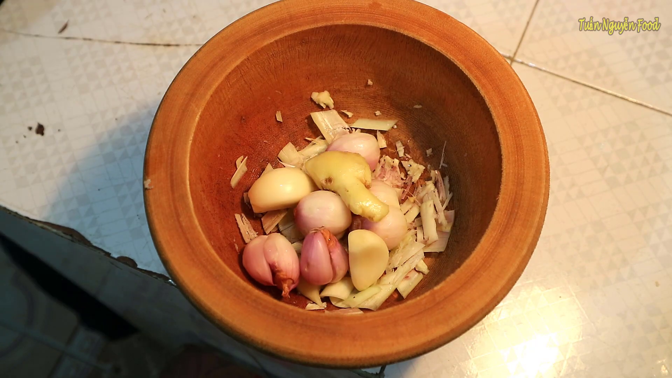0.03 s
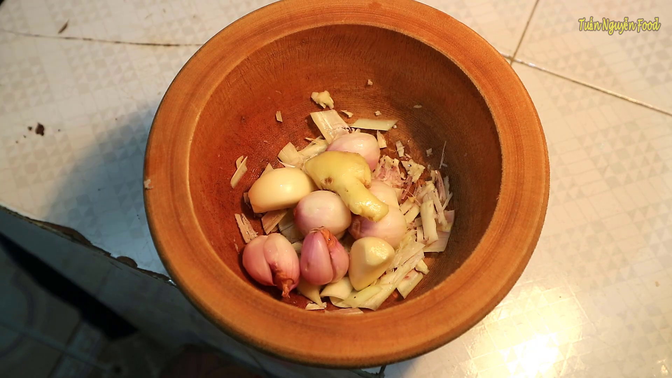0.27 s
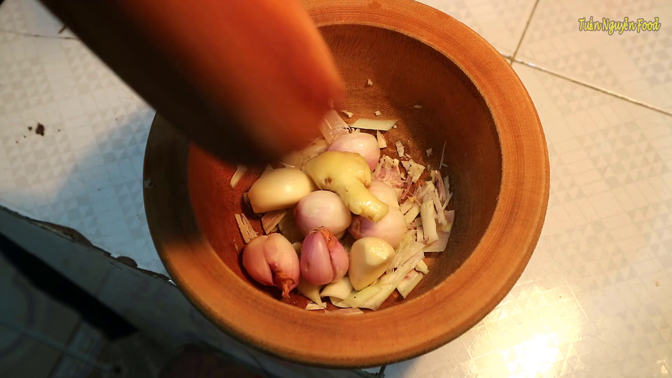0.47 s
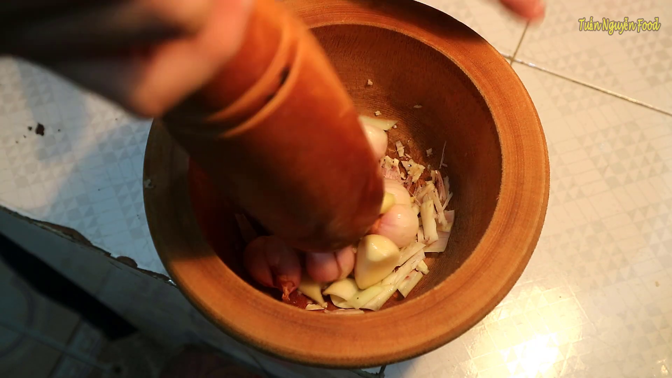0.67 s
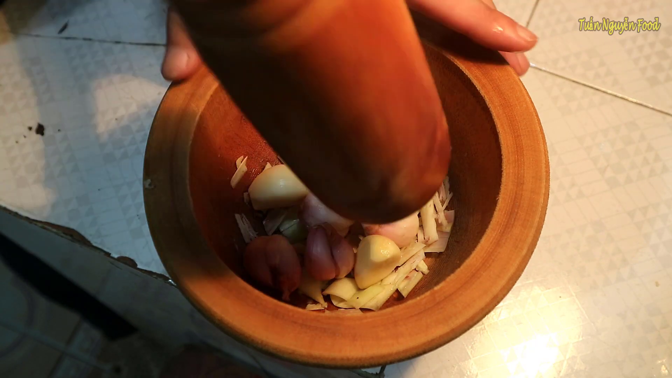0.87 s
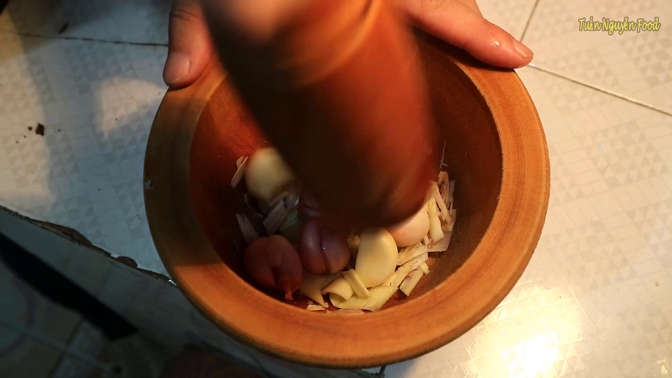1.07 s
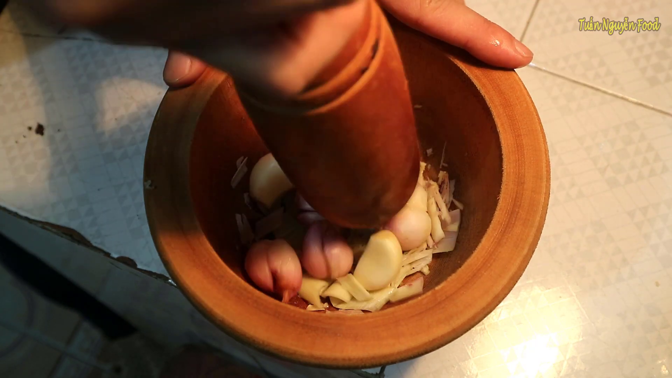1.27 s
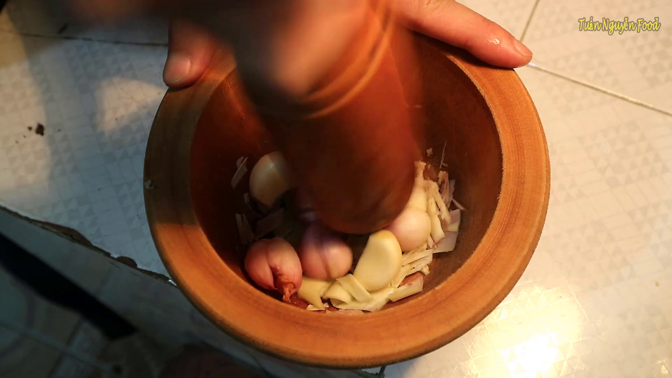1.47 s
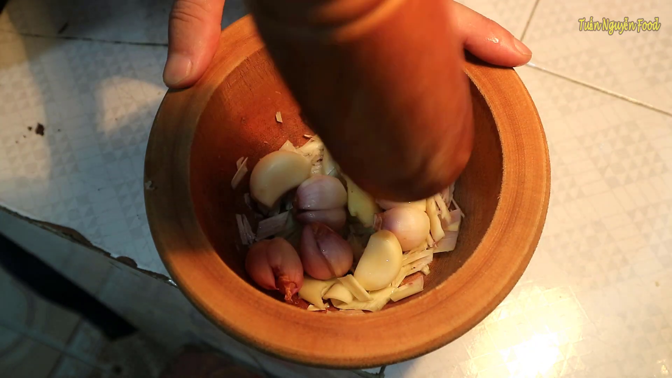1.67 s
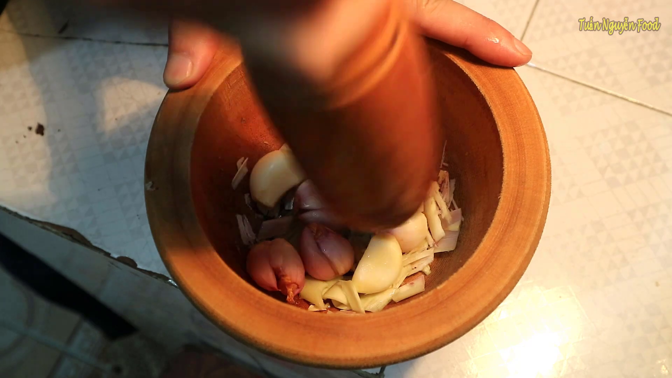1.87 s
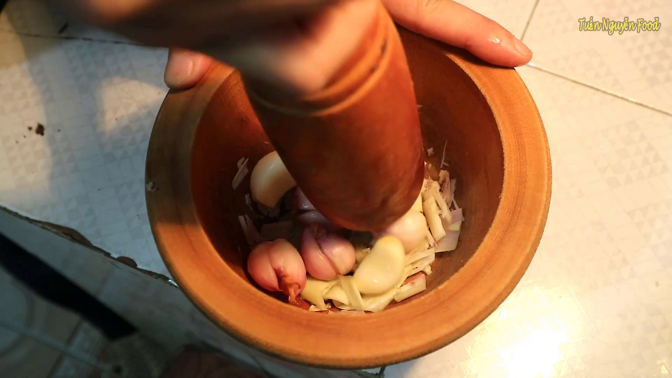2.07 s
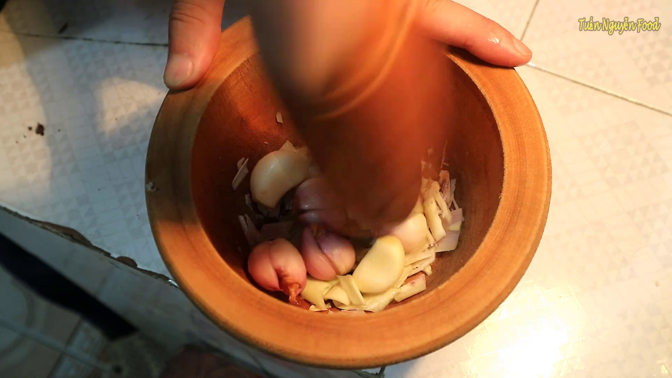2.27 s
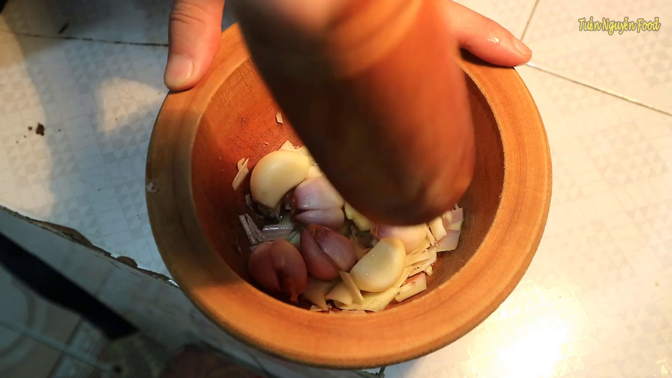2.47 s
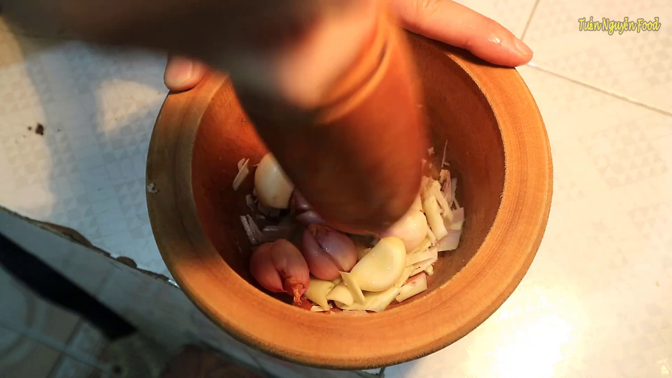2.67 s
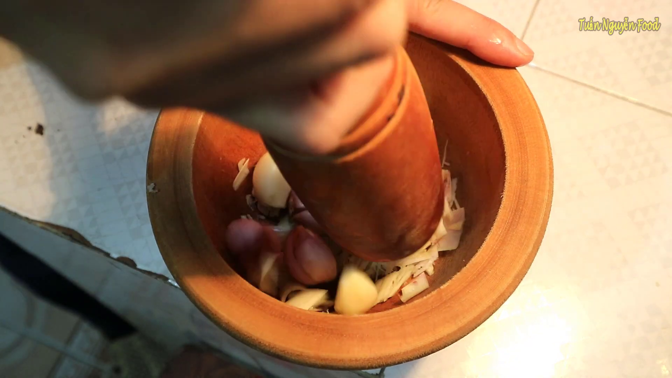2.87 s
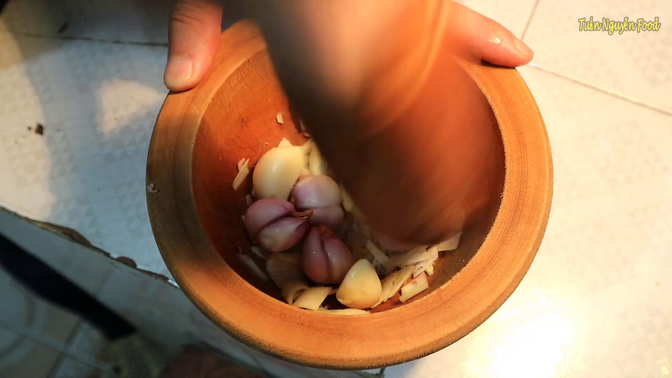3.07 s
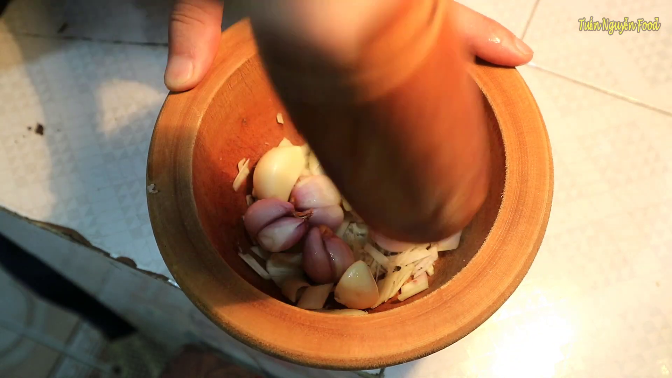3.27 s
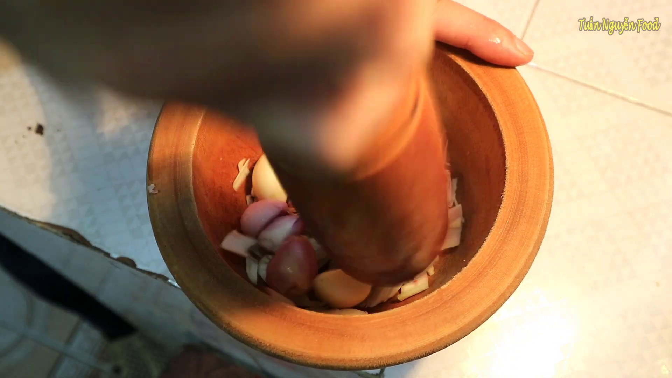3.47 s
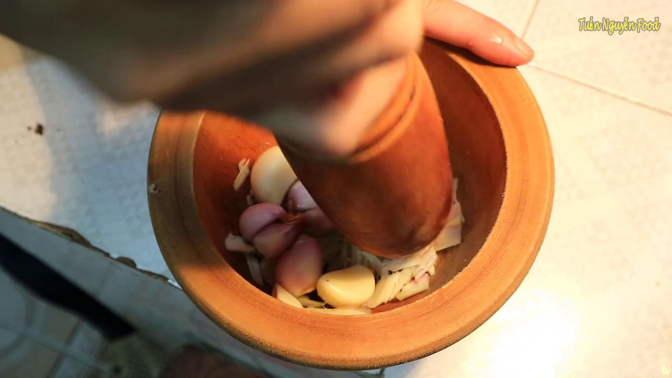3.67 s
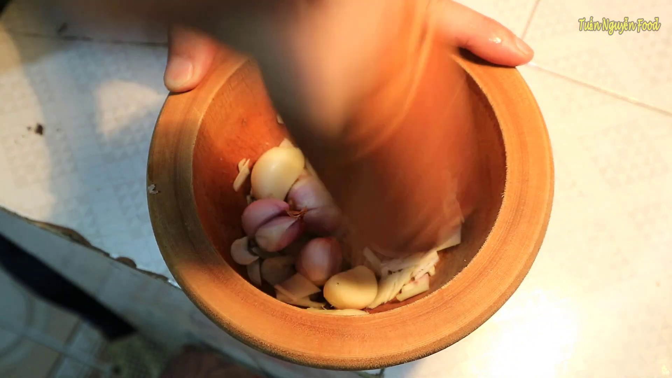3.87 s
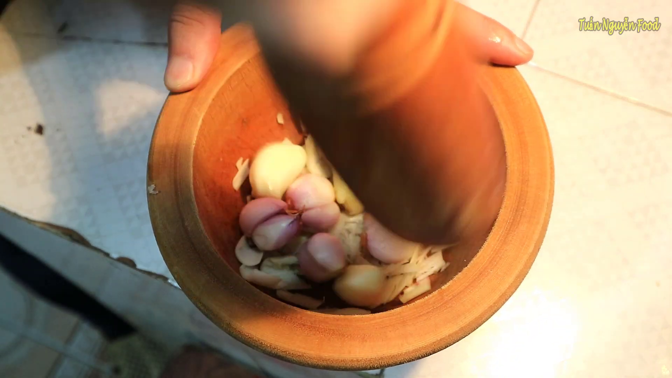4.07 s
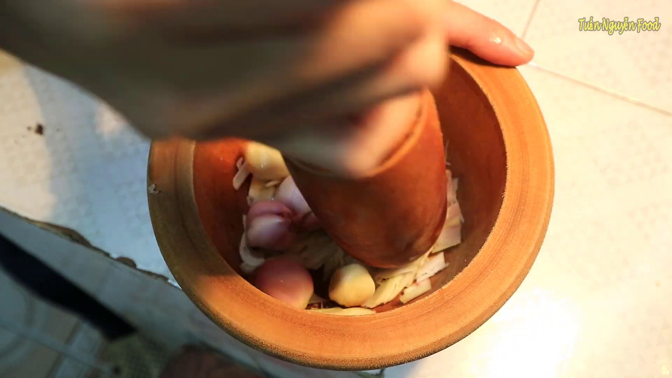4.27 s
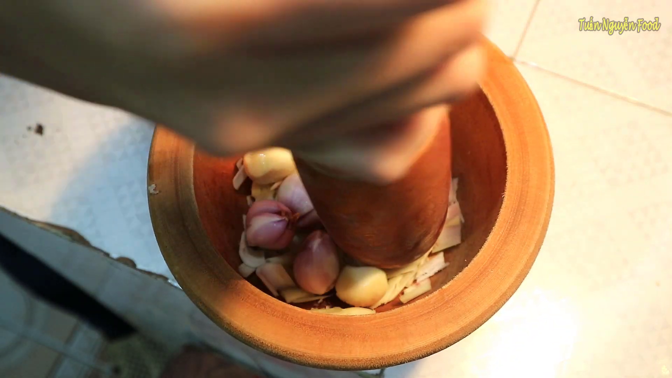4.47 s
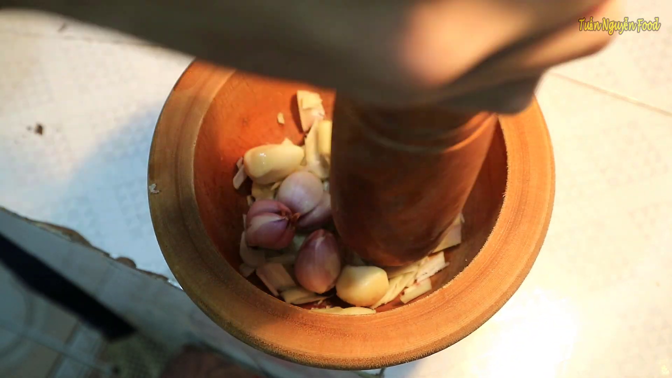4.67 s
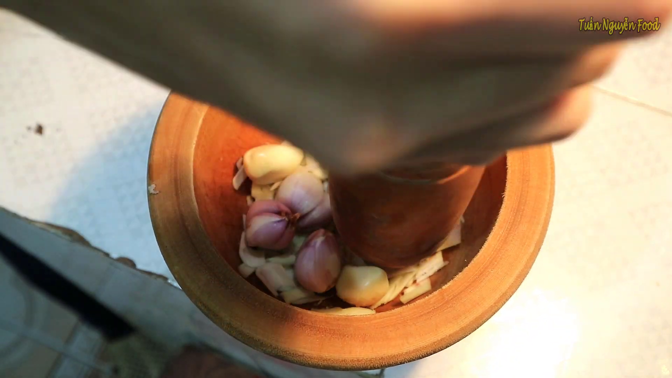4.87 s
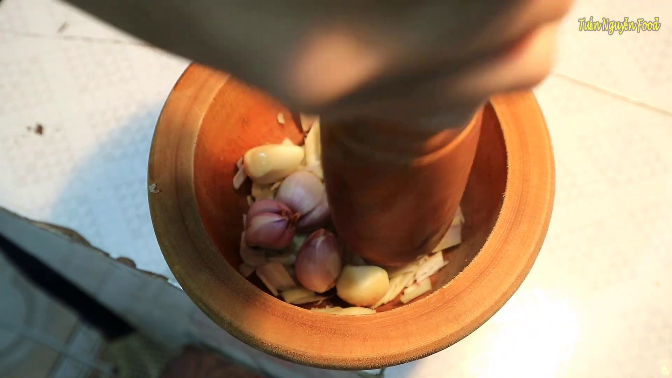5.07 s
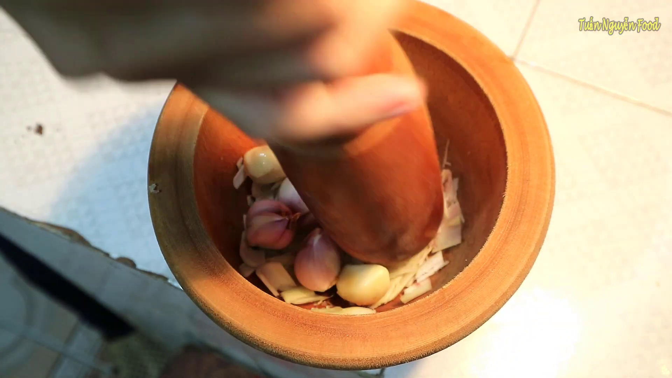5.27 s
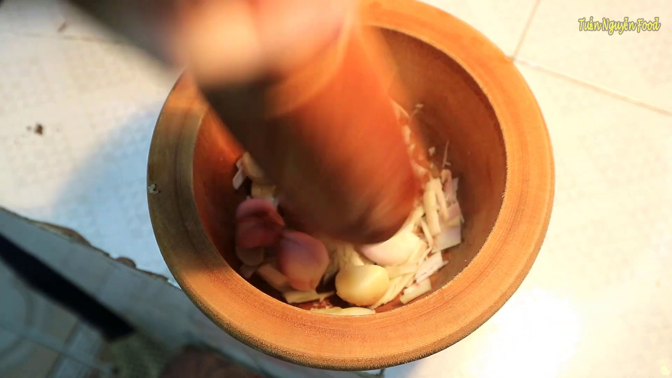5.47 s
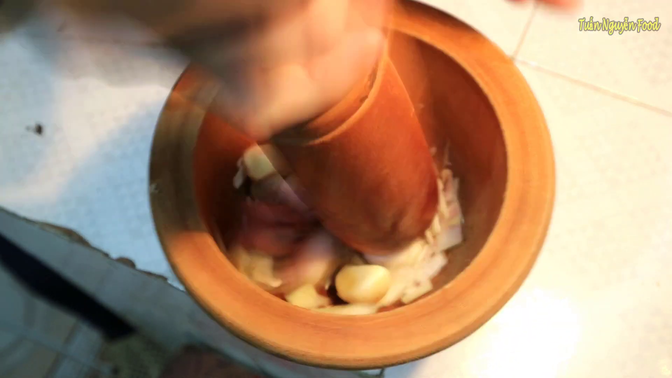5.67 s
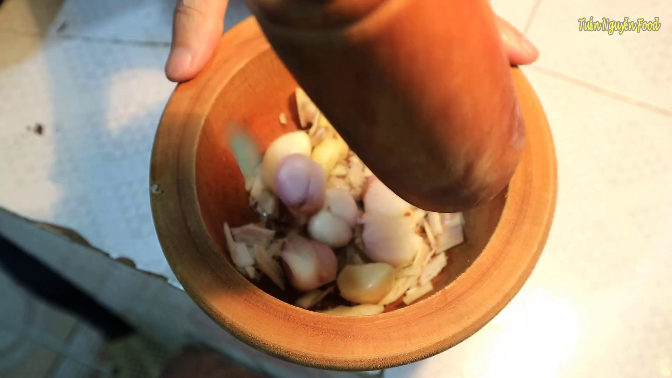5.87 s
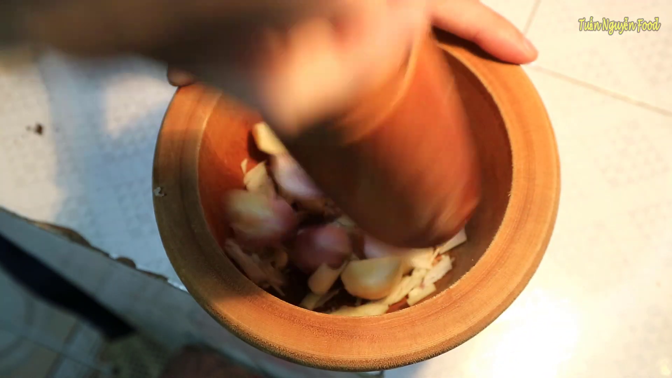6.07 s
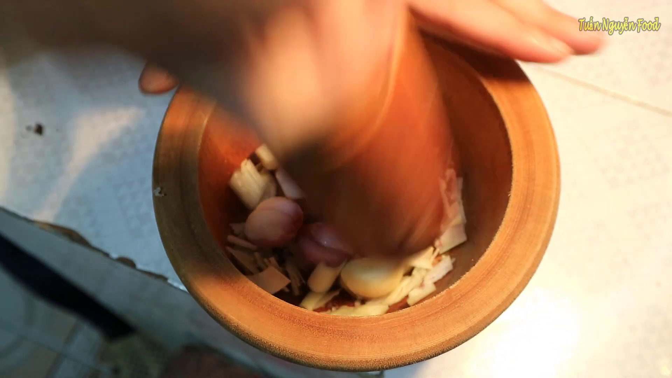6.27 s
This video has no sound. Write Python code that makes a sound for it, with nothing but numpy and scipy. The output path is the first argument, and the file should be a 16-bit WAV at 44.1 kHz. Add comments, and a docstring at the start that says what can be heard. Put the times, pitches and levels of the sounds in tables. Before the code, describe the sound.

Quiet, low kitchen room noise with faint sleeve movement opens the scene. Around 0.7 s the wooden pestle slides softly down the mortar wall and lands with a small, muffled double knock. From 1.0 to 4.25 s, thirteen firm blows fall roughly every 0.27 s: short hollow wooden knocks, slightly varied in pitch and hardness, each with crackling garlic skins and fibres. Boomy low counter resonance is strongest around 2.1 to 2.6 s; crunches grow brighter and sharper later, with the hardest crack near 3.2 s. Pounding stops from 4.3 to 5.7 s, leaving soft arm and cloth rustles, most noticeable near 5.05 and 5.4 s, and a barely audible tap at 5.13 s. A short rub leads to firm crunchy blows at 5.75 and 6.02 s, then a weak bounce at 6.13 s. Close stereo, stronger on the right, with short hard-room reflections.

```python
"""Small hard kitchen, tiled counter: a wooden pestle pounds garlic, shallots and lemongrass in a wooden mortar.
Two-port microphone; the mortar lies to its right, so the left port hears it weaker. Quiet room noise beneath.
Each blow swells for a few milliseconds as the herbs crush, knocks the bowl and sets low counter modes booming.
Snapping fibres are swarms of noise clicks; arm rustle and the pestle's slide are coloured, grainy noise.
Wall echoes and a dense noise tail answer the knocks and slides; a hiss of its own answers each crunch."""
import sys
import numpy as np
from scipy import signal
from scipy.fft import rfft, irfft
from scipy.io import wavfile
from scipy.ndimage import uniform_filter1d

SR = 44100
rng = np.random.default_rng(int(sys.argv[2]) if len(sys.argv) > 2 else 0)


def materialize(psi):
    """Save the field psi as 16-bit PCM at rate SR to the path in sys.argv[1].

    A 1-D psi becomes a single channel; in a 2-D psi each row is a channel.
    """
    bounded = np.clip(np.atleast_2d(psi).T, -1, 1)
    quanta = np.round(bounded * 32767).astype(np.int16)
    wavfile.write(sys.argv[1], SR, quanta)


N = 278712
T = np.arange(N) / SR


def amp(db):
    """Decibels to gain."""
    return 10 ** (np.asarray(db) / 20)


def unit(x):
    """Scales to rms 1."""
    return x / np.sqrt(np.mean(x ** 2) + 1e-20)


def burst(x, seconds):
    """Scales a short sound so that its energy equals rms 1 over the given time."""
    return x / np.sqrt(np.sum(x ** 2) / (seconds * SR) + 1e-20)


def read(points, hz):
    """Reads a curve on a log-frequency axis."""
    f, value = np.transpose(points)
    return np.interp(np.log(hz + 1), np.log(f + 1), value)


def colour(x, points, tilt_db=0):
    """Filters by a spectrum, tilted in dB per octave between 2.5 and 10 kHz."""
    hz = np.fft.rfftfreq(x.shape[-1], 1 / SR)
    octaves = np.log2(np.clip(hz, 2500, 10000) / 5000)
    gain = amp(read(points, hz) + tilt_db * octaves)
    return irfft(rfft(x) * gain, x.shape[-1])


def add(mix, s, sound):
    """Mixes a sound in at time s."""
    part = mix[..., max(round(s * SR), 0):][..., :sound.shape[-1]]
    part += sound[..., :part.shape[-1]]


def grainy(depth_db, samples):
    """Uneven gain from smoothed noise, varying by depth_db rms."""
    smooth = uniform_filter1d(rng.standard_normal(N), size=samples)
    return amp(depth_db * unit(smooth))


def correlated(a, b, likeness):
    """Mixes two noises into one whose correlation with a is likeness."""
    return likeness * a + np.sqrt(1 - likeness ** 2) * b


def diffuse(points, left_db, likeness):
    """Noise of a given colour that reaches the two ports from all sides."""
    a, b = unit(colour(rng.standard_normal((2, N)), points))
    return np.array([amp(left_db) * correlated(a, b, likeness), a])


# how far the left port leads the right one: f/Hz, phase/rad
PORT_PHASE_LEAD = [(100, 4.55), (190, 4), (340, 2.2), (600, 1), (850, .65), (1200, 1.2), (2500, .3)]


def ports(x, left_db):
    """The two microphone ports: the left one is weaker and leads in phase."""
    lead = read(PORT_PHASE_LEAD, np.fft.rfftfreq(N, 1 / SR))
    left = irfft(rfft(x) * np.exp(1j * lead), N)
    return np.array([amp(left_db) * left, x])


# colour of the quiet kitchen before it is scaled: f/Hz, level/dB
ROOM_NOISE = [(20, -18), (45, -8.5), (75, -10.5), (102, 1.5), (160, -7.5), (280, -8), (380, -4.5),
              (500, -11.5), (700, -10), (1100, -12.5), (1700, -22), (5000, -38.5), (11200, -56),
              (15000, -70)]


def room_noise(level_db=-57):
    """Steady room noise under the pounding, partly opposed in phase between the ports."""
    return amp(level_db) * diffuse(ROOM_NOISE, left_db=-4, likeness=-0.49)


# decay time of the tail: f/Hz, t60/s
TAIL_T60 = [(150, 1), (400, 0.58), (900, 0.42), (2000, 0.5), (5000, .3), (12000, .2)]
# colour of the tail: f/Hz, level/dB
TAIL_COLOUR = [(150, -30.5), (400, 2.5), (650, -13.5), (850, -14.3), (1300, -12.3), (2000, -14.5),
               (3000, -13.5), (5000, -11), (9000, -13.5), (12000, -7), (14000, -21)]
# first reflections, before their treble is dulled: delay/s, left gain, right gain
WALL_ECHOES = [(.0083, .06, -0.032), (.0118, -0.084, 0.038), (.0147, 0.019, 0.15), (.0185, .05, -.09),
               (.0335, 0.037, 0.05)]


def kitchen(x, left_db=-5.5, likeness=-0.19):
    """A few wall echoes, 3 to 11 m longer than the direct path, and a tail whose bands die at their own speeds."""
    a, b = rng.standard_normal((2, SR))
    noise = np.array([correlated(a, b, likeness), a])
    hz, t, bands = signal.stft(noise, SR, nperseg=256)
    t60 = read(TAIL_T60, hz)[:, None]
    bands = bands * amp(read(TAIL_COLOUR, hz)[:, None] - 60 * t / t60)
    bands *= np.sqrt(2 * np.log(1000) / (t60 * SR))  # slow and fast bands carry equal energy before colouring
    response = signal.istft(bands, SR, nperseg=256)[1][:, :SR] * amp([[left_db], [0]])
    response *= 1 - np.exp(-(np.arange(SR) / SR / 0.0021) ** 2)  # the tail builds up
    echoes = np.zeros((2, SR))
    for delay, left, right in WALL_ECHOES:
        add(echoes, delay, np.array([[left], [right]]))
    response += colour(echoes, [(1200, 2), (3000, -10.5), (12000, -21)])  # clutter scatters the treble
    return signal.fftconvolve(x[None], response, axes=1)[:, :N]


def swell(middle, half_length):
    """The speed of one movement: it gathers, peaks and eases off."""
    return 1 / np.cosh(np.clip((T - middle) / half_length, -20, 20))


# colour of the sleeve: f/Hz, level/dB
RUSTLE_SPECTRUM = [(150, -41), (250, -15), (394, -11), (429, -13), (507, -1), (962, -3), (1200, -3),
                   (3340, -5.5), (11100, -20), (14000, -45)]
# arm and sleeve moving near the microphone: middle t/s, relative level/dB, half length/s
ARM_MOVES = [(.055, -61, .055), (.44, -59.5, .085), (.6, -59.5, .1), (4.55, -63, .06), (4.77, -57, .05),
             (4.905, -54, .045), (5.048, -48.5, .024), (5.17, -55.5, .07), (5.39, -47.5, .048),
             (5.6, -62, .14), (5.95, -62, .14)]


def hand(rustle_db=1., still_db=-70, swing_db=-68.5, swing_lead_s=0.013, swing_s=0.026):
    """Soft rustle that follows the arm's speed: on each movement, and a little on each firm downstroke."""
    power = amp(still_db) ** 2  # faint rustle between movements
    for s, db, half_length in ARM_MOVES:
        power = power + (amp(db) * swell(s, half_length)) ** 2
    strokes = sum(swell(s - swing_lead_s, swing_s) for s, db, *_ in BLOW_LIST if db > -30)
    level = amp(rustle_db) * np.sqrt(power) + amp(swing_db) * strokes
    return level * grainy(0.8, samples=400) * diffuse(RUSTLE_SPECTRUM, left_db=-1, likeness=-0.14)


# colour of wood rubbing on wood: f/Hz, level/dB
SLIDE_SPECTRUM = [(120, -36.5), (280, -5), (450, 0), (680, 0), (1100, 0), (1500, -6), (2300, -5),
                  (3200, -7), (5000, -23), (9000, -33), (13000, -52)]
# the pestle sliding down the wall into the heap: start t/s, length/s, level/dB
SLIDE_LIST = [(.698, .042, -42.5), (5.672, .07, -43)]


def slide(rise_s=.022, t60_s=.09):
    """The pestle rubs down the wall in fine uneven slips; the rub builds, holds and dies when the pestle lands."""
    level = np.zeros(N)
    for s, length, db in SLIDE_LIST:
        after_landing = np.maximum(T - s - length, 0)
        level += np.clip((T - s) / rise_s, 0, 1) * amp(db - 60 * after_landing / t60_s)
    slips = grainy(1.5, samples=150) * rng.standard_normal(N)
    return level * unit(colour(slips, SLIDE_SPECTRUM))


# colour of the room's hiss after a crunch: f/Hz, level/dB
WASH_COLOUR = [(400, -12), (1200, -3), (2000, 1.5), (2700, -1.5), (2980, 6), (3300, -1.5), (4400, -1),
               (6500, -6), (9000, -12), (11800, -19.5), (13300, -32), (16000, -49)]


def wash(wash_db=-8.3, early_t60=0.14, late_t60=0.37, late_db=-5., late_tilt_db=-0.5,
         tilt_share=0.41, left_db=-4., full_s=0.0022):
    """Each crunch scatters off the bowl and the tiles as a smooth hiss that dulls as it dies."""
    out, t = np.zeros((2, N)), np.arange(SR // 2) / SR
    build = 1 - np.exp(-t / 0.0023)
    for s, db, spread, bright_db, _ in CRUNCH_LIST:
        share = np.sqrt(min(spread / full_s, 1))  # a very short crack scatters less
        tilt_db = tilt_share * bright_db
        early, late = rng.standard_normal((2, 2, len(t)))
        early = colour(early, WASH_COLOUR, tilt_db) * amp(-60 * t / early_t60)
        late = colour(late, WASH_COLOUR, tilt_db + late_tilt_db) * amp(late_db - 60 * t / late_t60)
        add(out, s, share * amp(db + wash_db) * burst((early + late) * build, 0.028))
    return out * amp([[left_db], [0]])


# low modes of the counter and the kitchen: f/Hz, level/dB, t60/s
COUNTER_MODES = [(87.5, -3.5, 0.59), (98.63, 3, 0.6), (113.5, 1.5, 0.45), (126.6, -8.5, 0.65),
                 (134.6, -4.5, 1), (149.6, -4.5, 0.58), (161.36, -2, 0.66), (188.3, 3, 0.46),
                 (194.5, -11.5, 0.86), (229, -1.5, 0.34), (252, -9, .3), (292, 5.5, 0.13),
                 (334.1, -6.5, 0.37)]


def counter(boom_db=-4.0, rise_s=0.0025, build_s=0.06, early=0.71):
    """Every blow passes through the mortar's foot and wakes the same beating low modes."""
    t = np.arange(SR) / SR
    hz, level, t60 = np.transpose(COUNTER_MODES)[:, :, None]
    spread = np.pi * np.arange(len(hz))[:, None] ** 2 / len(hz)  # the modes do not peak together
    boom = (amp(level - 60 * t / t60) * np.sin(2 * np.pi * hz * t + spread)).sum(0)
    boom *= 1 - np.exp(-t / rise_s)
    boom *= 1 - (1 - early) * np.exp(-t / build_s)
    boom = signal.sosfilt(signal.butter(2, 66, "highpass", fs=SR, output="sos"), boom)  # deep bass radiates poorly
    out = np.zeros(N)
    for s, *_, db in BLOW_LIST:
        add(out, s - .003, amp(db + boom_db) * burst(boom, 0.18))
    return out


def contact(t, lead_s=0.0065, edge_s=0.0005):
    """Gate that opens as the pestle meets the heap, a few milliseconds before it stops at t = 0."""
    return .5 + .5 * np.tanh((t + lead_s) / edge_s)


# colour of breaking fibres: f/Hz, level/dB
FIBRE_COLOUR = [(500, -20), (1500, 1), (2200, 0.5), (3000, 1.5), (4300, 4), (5200, -2), (7000, -3.5),
                (9000, -8), (11500, -16), (13000, -23), (16000, -33)]
# herbs and skins breaking: t/s, relative level/dB, relative spread/s, relative brightness/(dB per octave),
# snapping piece f/Hz
CRUNCH_LIST = [(0.0852, -59.5, 0.0031, -16, 4840), (0.7132, -48.4, 0.0063, -5, 4200),
               (0.727, -40.5, 0.008, -6, 4100), (1.0166, -38.7, 0.009, -2, 3200),
               (1.3004, -37, 0.0039, 1.5, 4620), (1.3311, -46.5, 0.0043, -4.9, 3030),
               (1.5534, -37.5, 0.0015, 3.5, 2830), (1.5852, -53, 0.0032, -10, 6000),
               (1.6058, -51, 0.004, -7, 6040), (1.6188, -52.5, 0.0056, -6, 6040),
               (1.8248, -35.5, 0.0018, 3, 2800), (1.9071, -60.5, 0.0018, 1.3, 6060),
               (2.1014, -33, 0.0018, -4.5, 2750), (2.3614, -33.3, 0.0019, 2.5, 4700),
               (2.6343, -32.5, 0.0016, 0, 3700), (2.8971, -33, 0.0023, 0, 6550),
               (3.1728, -23.5, 0.00085, 6, 7000), (3.44, -29.5, 0.0014, 1.5, 2820),
               (3.7108, -31, 0.002, 7, 5650), (3.9692, -29.5, 0.0024, 4.5, 5170),
               (4.2409, -23.7, 0.0017, -2.5, 4340), (5.1109, -53, 0.0005, -15, 4100),
               (5.7491, -27, 0.0024, -2, 6740), (6.0232, -25.3, 0.003, 0.5, 4400)]


def herbs(crunch_db=0.3, snaps_per_s=11000, size_db=2.0, spread_share=1.2, crack=0.26, tilt_share=0.5,
          piece_db=7.5, apart=0.5):
    """Fibres snap in a swarm around a sharper crack, coloured by the piece that breaks; snaps lean left or right."""
    out, t = np.zeros((2, N)), (np.arange(2048) - 1024) / SR
    for s, db, spread, bright_db, hz in CRUNCH_LIST:
        snaps = rng.standard_normal(len(t)) * (rng.random(len(t)) < snaps_per_s / SR)
        snaps *= amp(size_db * np.minimum(rng.exponential(1, len(t)), 3))  # a few snaps are much larger
        swarm = snaps * np.exp(-abs(t) / (spread_share * spread)) * contact(t)
        split = rng.standard_normal(len(t)) * np.exp(-abs(t) / 0.00026)  # the sharper crack
        lean = 1 + apart * np.outer([1, -1], rng.choice([-1, 1], len(t)))
        sound = lean * (unit(swarm) + crack * unit(split))
        sound = colour(sound, FIBRE_COLOUR, tilt_share * bright_db + 1.5)
        sound = colour(sound, [(hz / 1.117, 0), (hz, piece_db), (hz * 1.26, 0)])  # the piece resonates
        add(out, s + t[0], amp(db + crunch_db) * burst(sound, 0.038))
    return out


def ring(modes, t, swell_s, weights_db=0):
    """Modes build up while the pestle sinks in (t < 0) and die away after it stops."""
    hz, db, t60 = np.transpose(modes)[:, :, None]
    build = np.exp(-(np.minimum(t, 0) / swell_s) ** 2)
    decay = amp(db + weights_db - 60 * np.maximum(t, 0) / t60)
    return (build * decay * np.cos(2 * np.pi * (hz * t + rng.random(hz.shape)))).sum(0)


def favour(modes, hz, depth_db):
    """The struck spot wakes the modes within half an octave of its pitch; the others stay weaker."""
    half_octaves = 2 * np.log2(np.transpose(modes)[0][:, None] / hz)
    return -depth_db * np.minimum(half_octaves ** 2, 1)


# modes of the mortar: f/Hz, relative level/dB, t60/s
BOWL_MODES = [(336, -2.5, 0.13), (430, -8, .08), (546.5, -11, 0.24), (586, 0, 0.11), (646, 11.5, 0.032),
              (715, -1, 0.067), (805, -5.5, 0.22), (863, -6, 0.19), (945.5, 5.5, 0.069), (1100, -0.5, .06)]
# modes that only hard contact of the two woods wakes: f/Hz, relative level/dB, t60/s
CLACK_MODES = [(1103, 6.5, 0.02), (1207, -0.5, 0.023), (1290, -14, 0.18), (1352, -3.5, 0.022),
               (1560, -5.5, 0.014), (1757, -5.5, 0.017), (2060, -9, 0.0023), (2590, 2, 0.003),
               (2890, -6.5, 0.011)]
# one row a blow: t/s, relative knock level/dB, struck spot f/Hz, relative cushioning by the herbs/s,
# relative wood-on-wood clack level/dB, clack f/Hz, relative counter boom level/dB
BLOW_LIST = [(.7352, -38, 690, .0016, -48, 1100, -54), (.751, -39.5, 635, .0016, -55, 1100, -64),
             (.768, -49, 560, .0012, -64, 1100, -66), (1.0162, -21.3, 744, .0027, -29, 1090, -45),
             (1.2996, -30.5, 805, .0024, -48, 2200, -45.5), (1.5532, -18.3, 790, .0019, -28.5, 1100, -41),
             (1.8241, -20.5, 875, .0021, -25, 1200, -36.5), (2.1009, -21.3, 795, .0019, -25, 1480, -29.7),
             (2.362, -20.3, 775, .0024, -29, 1150, -28.3), (2.6327, -23, 1010, .0011, -20.8, 1410, -27.3),
             (2.8956, -23.3, 870, .0021, -33.5, 1300, -40.5), (3.1721, -16, 846, .0028, -26, 1550, -39.5),
             (3.4387, -21.7, 830, .0017, -35.5, 1500, -39.5), (3.7084, -25, 823, .0014, -36, 1400, -31.5),
             (3.9692, -24.3, 800, .0024, -39.5, 1920, -34), (4.243, -22.5, 855, .0036, -28.5, 1750, -40.7),
             (5.1335, -54.5, 706, .002, -56.5, 1500, -70), (5.7498, -22.3, 805, .0018, -28.5, 1260, -34),
             (6.0214, -23.5, 770, .0034, -30.5, 2090, -32.3), (6.1265, -39, 770, .0026, -50, 1250, -60.5),
             (6.158, -49.5, 788, .0032, -64, 1590, -65.5)]


def mortar(knock_db=0., ring_db=-4.3, clack_db=-1.0, spot_db=4.0, clack_spot_db=6.5, swell_share=1.044,
           skirt=0.24, clack_swell_s=0.0023, push_db=-17.0, push_hz=306.0, push_s=0.0012,
           jolt_db=-12.5, jolt_s=0.00085, ring_from_boom=.35):
    """The bowl is driven hard while the pestle crushes through the herbs, then rings on weakly near that pitch."""
    out, t = np.zeros(N), np.arange(-.015, .15, 1 / SR)
    for s, db, hz, cushion, hard_db, hard_hz, boom_db in BLOW_LIST:
        force = np.exp(-(t / (swell_share * cushion)) ** 2) + skirt * np.exp(-abs(t / cushion))
        knock = burst(force * np.sin(2 * np.pi * hz * t), .016)
        # the abrupt stop widens the knock's spectrum
        jolt = np.exp(-(t / jolt_s) ** 2) * np.cos(2 * np.pi * hz * t)
        knock += amp(jolt_db) * burst(jolt, .016)
        # the whole bowl is shoved down
        push = np.exp(-(t / push_s) ** 2) * np.cos(2 * np.pi * push_hz * t)
        knock += amp(push_db) * burst(push, .016)
        after = burst(ring(BOWL_MODES, t - .002, .003, favour(BOWL_MODES, hz, spot_db)), .035)
        after_db = db + ring_from_boom * (boom_db - db)  # a blow that reaches the bottom rings more
        clack = ring(CLACK_MODES, t, clack_swell_s, favour(CLACK_MODES, hard_hz, clack_spot_db))
        clack = burst(clack, .016)
        sound = amp(db + knock_db) * knock
        sound += amp(after_db + ring_db) * after
        sound += amp(hard_db + clack_db) * clack
        add(out, s + t[0], sound * contact(t))
    return signal.sosfilt(signal.butter(2, 90, "highpass", fs=SR, output="sos"), out)  # the knocks carry no deep bass


def scene():
    """Mortar, herbs and counter lie to the right of the microphone, in a quiet kitchen."""
    knocks, rub = mortar(), slide()
    background = room_noise() + kitchen(knocks + rub) + hand() + wash()
    boom = ports(counter(), left_db=-6.0)
    crunches = herbs() * amp([[-6.8], [0]])
    wood = ports(rub, left_db=-5.0) + ports(knocks, left_db=-10.0)
    return background + boom + crunches + wood


def record(dry, ceiling=.85, edge_hz=16200):
    """Soft limiting rounds the sharpest peaks; then a low-pass sets the band limit."""
    soft = ceiling * np.tanh(dry / ceiling)
    lowpass = signal.firwin(511, edge_hz, window=("kaiser", 9), fs=SR)
    return signal.oaconvolve(soft, lowpass[None], "same")


dry = scene()
out = record(dry)
materialize(out)
```